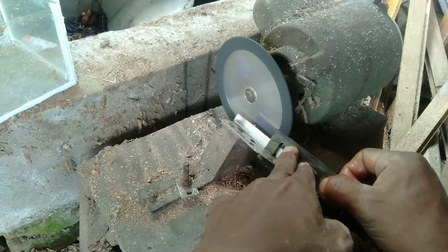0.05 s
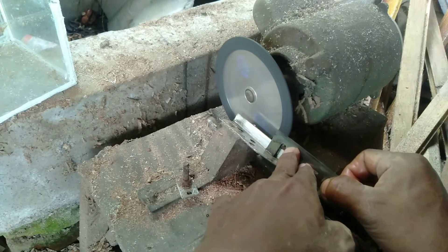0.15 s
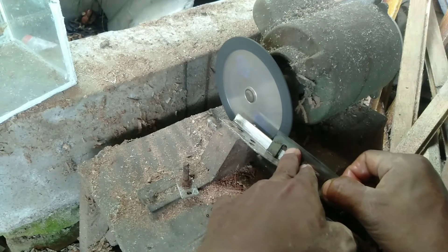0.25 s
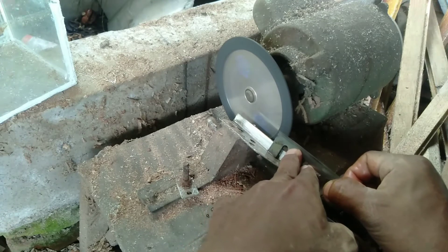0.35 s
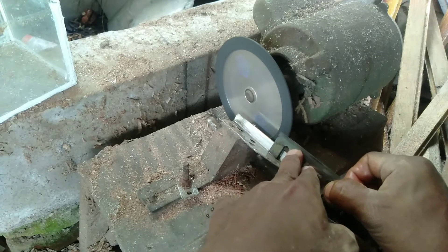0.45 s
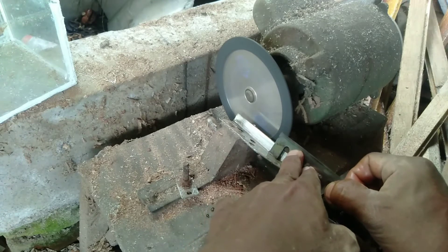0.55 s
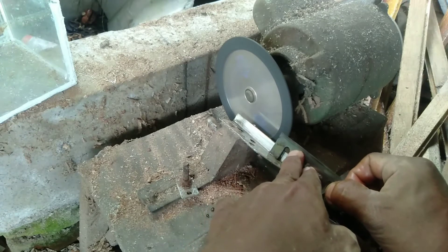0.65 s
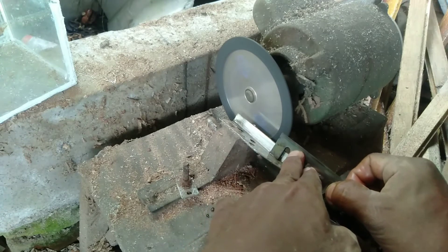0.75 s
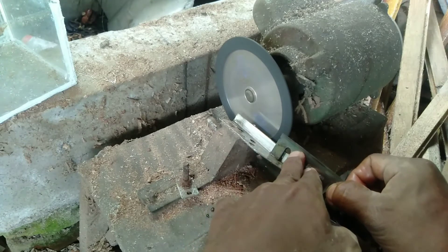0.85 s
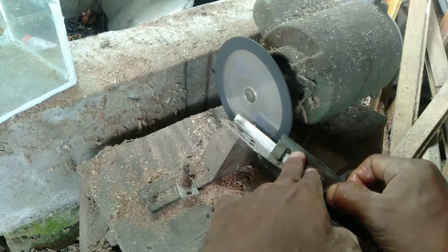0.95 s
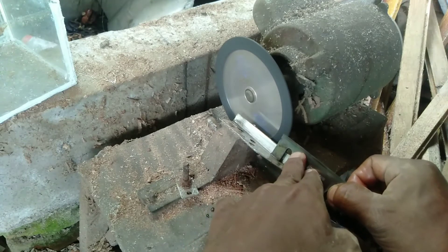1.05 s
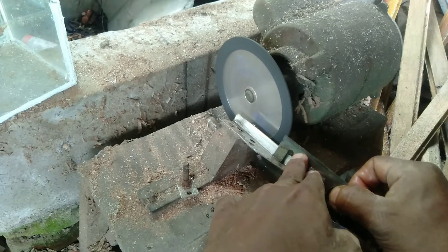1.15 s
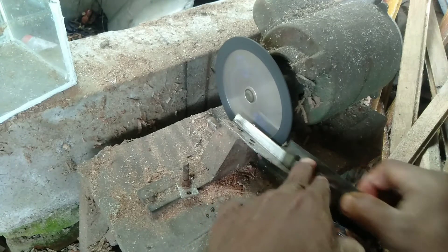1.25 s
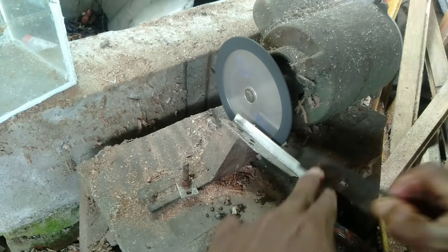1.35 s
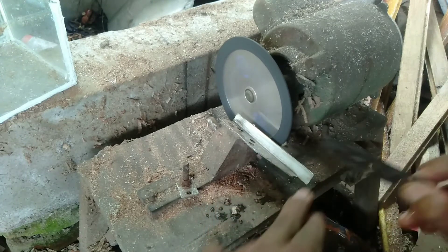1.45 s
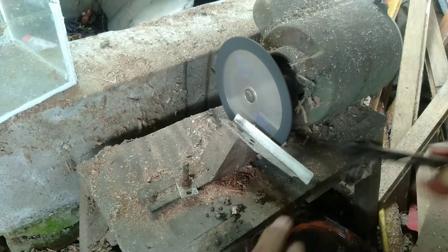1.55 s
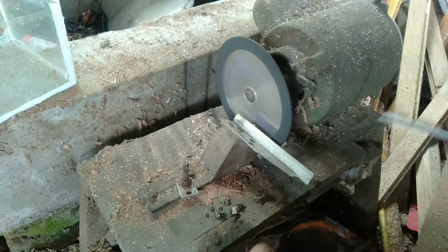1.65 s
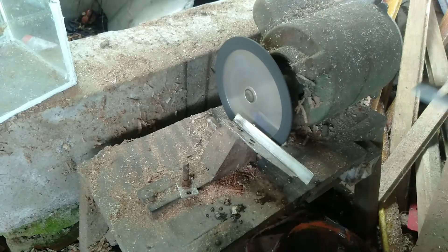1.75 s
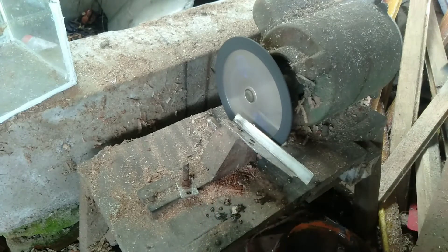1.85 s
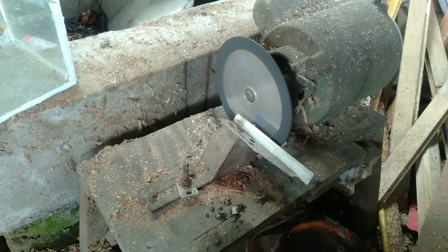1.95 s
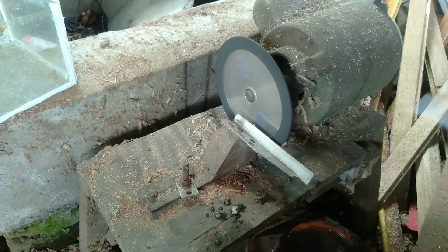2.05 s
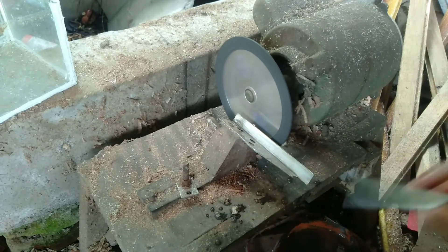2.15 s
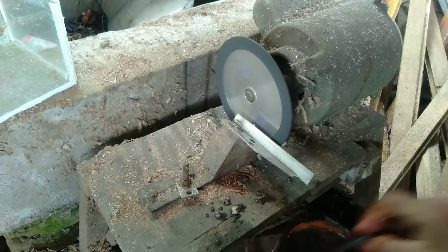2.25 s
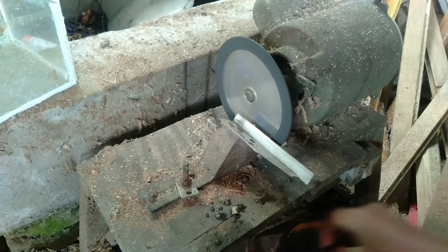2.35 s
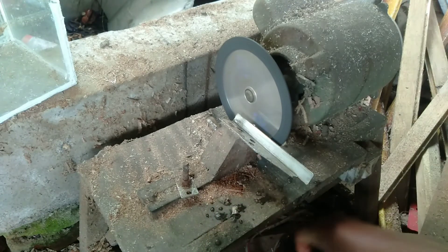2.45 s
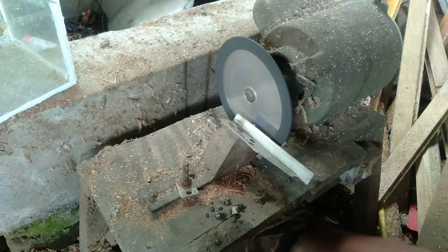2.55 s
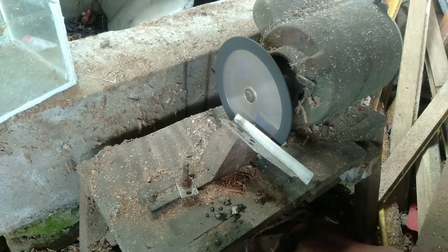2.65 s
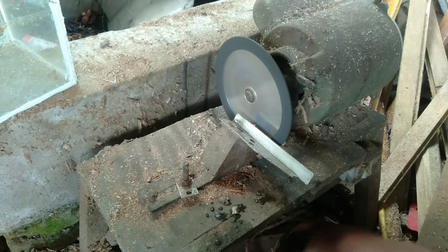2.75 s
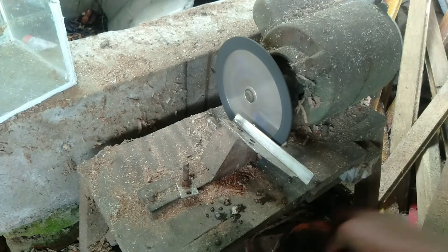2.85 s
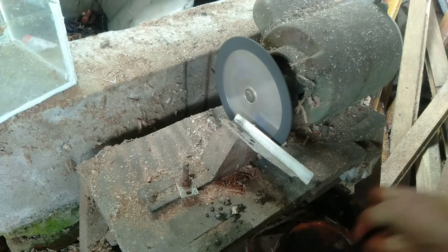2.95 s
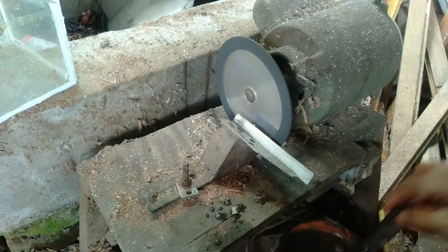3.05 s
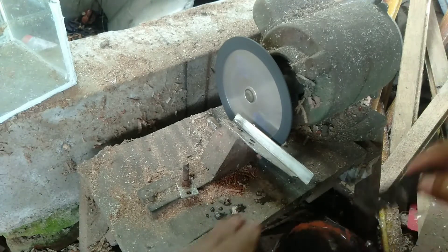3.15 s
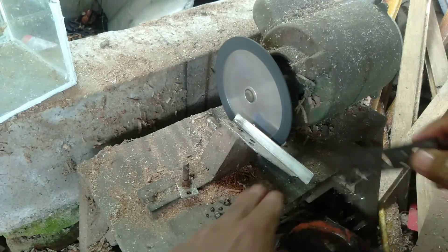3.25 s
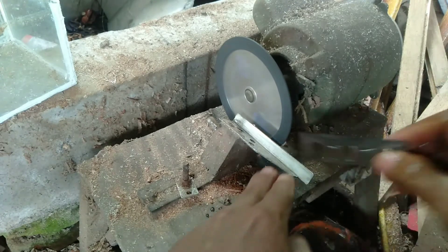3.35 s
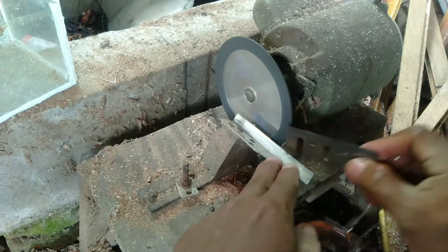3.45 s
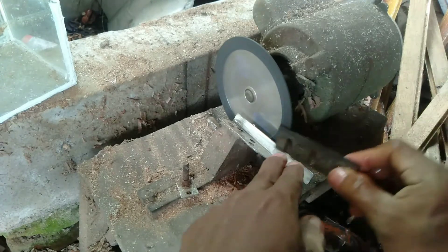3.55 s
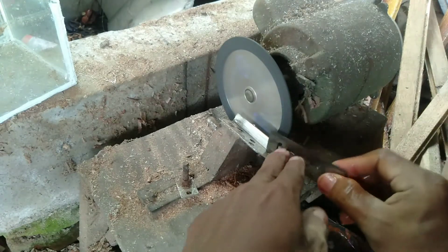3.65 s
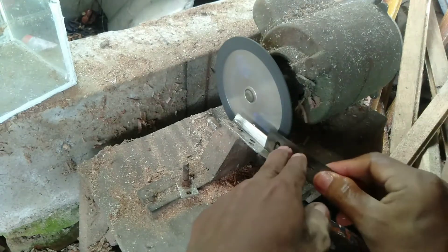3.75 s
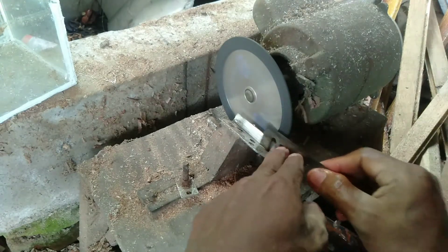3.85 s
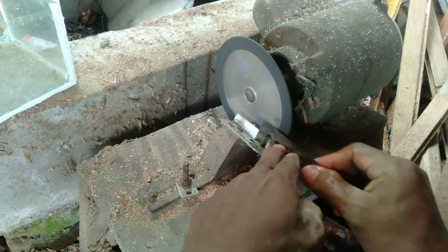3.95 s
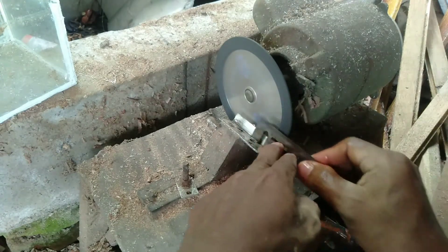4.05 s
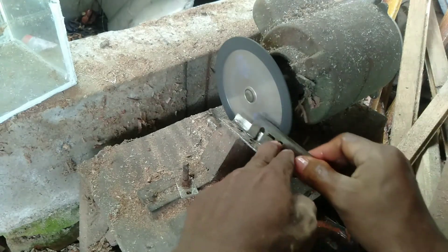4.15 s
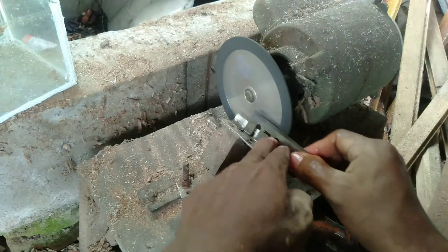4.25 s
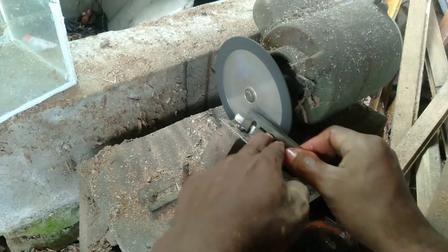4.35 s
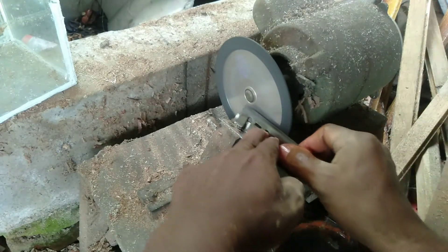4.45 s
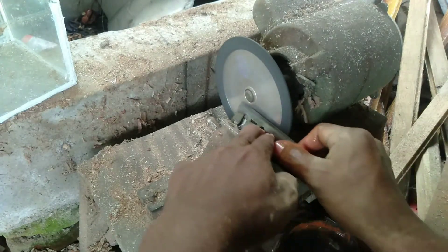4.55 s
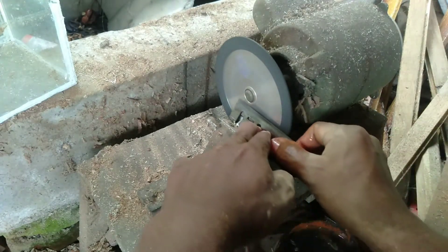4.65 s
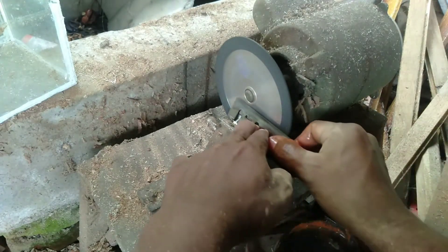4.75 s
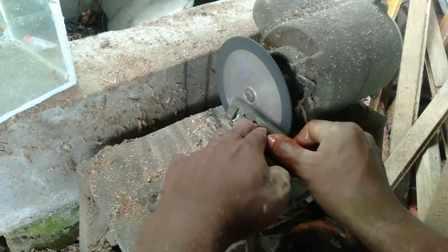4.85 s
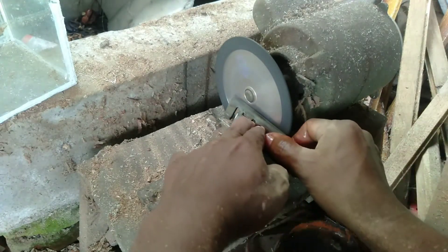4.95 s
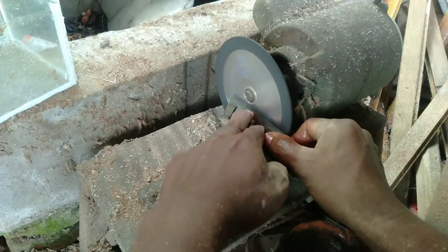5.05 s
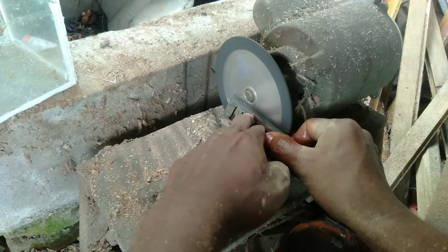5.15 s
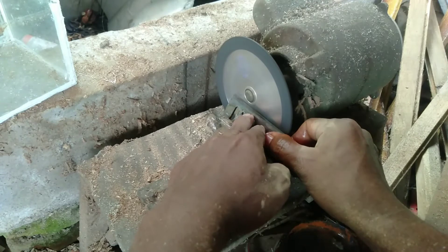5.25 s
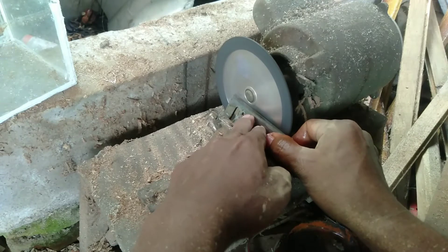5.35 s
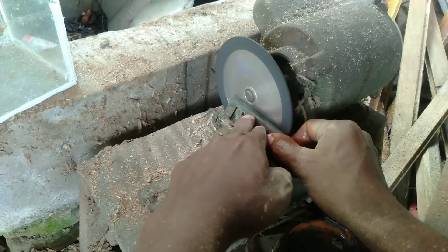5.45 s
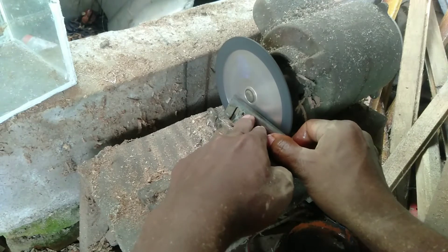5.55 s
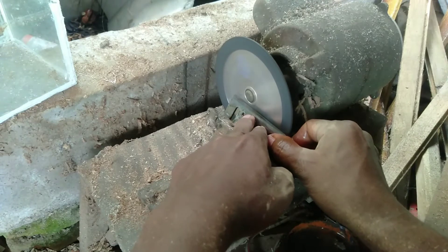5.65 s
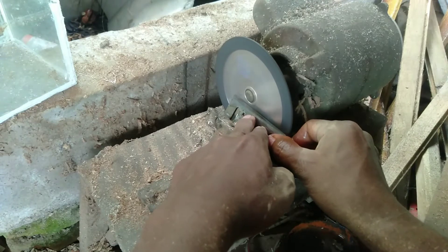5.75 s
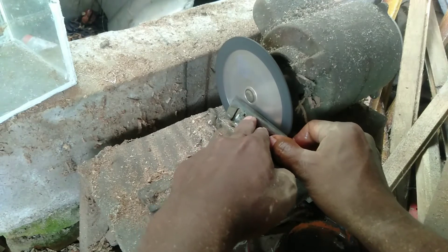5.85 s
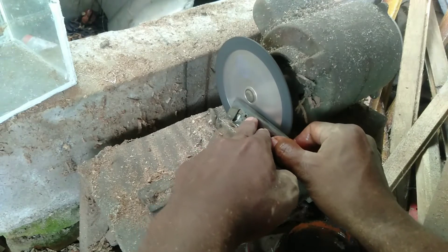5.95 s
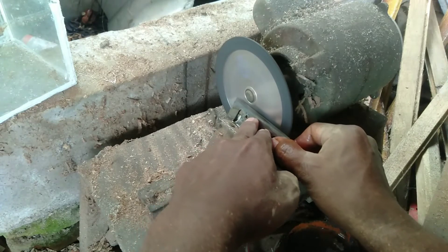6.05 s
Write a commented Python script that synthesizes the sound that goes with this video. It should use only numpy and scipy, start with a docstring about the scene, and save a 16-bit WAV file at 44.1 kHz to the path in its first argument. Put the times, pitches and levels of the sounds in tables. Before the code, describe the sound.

Close up at a workbench, a steel blade is pressed to a thin spinning grinding wheel, making a high, buzzing rasp. It lifts away after about a second, leaving the motor humming with rattling bearings and a thin whine. A quick cluster of metal clinks and knocks follows, then a dull slide and a brief squeal. The blade meets the wheel again in a much louder pass that grows to the end.

```python
"""At a workbench, close to the microphone, a steel blade is ground twice on a thin wheel spun by a motor.
Grit and a high spot replayed every turn excite the blade's resonances, so the steel buzzes at the shaft rate.
Light touches squeal, the blade rubs along the tool rest, and knocks on it add crack, ring and thump.
Behind lie a bearing's rattle bursts at the cage rate, shaft harmonics, filtered noise and a thin whine."""
import sys
import numpy as np
from scipy import signal
from scipy.fft import rfft, irfft
from scipy.io import wavfile
from scipy.ndimage import uniform_filter1d, map_coordinates

SR = 44100
rng = np.random.default_rng(int(sys.argv[2]) if len(sys.argv) > 2 else 0)


def store_wav(level_fs):
    """Save 16-bit WAV to argv[1]."""
    pcm = np.round(np.clip(np.atleast_2d(level_fs), -1, 1) * 32767)
    wavfile.write(sys.argv[1], SR, pcm.T.astype(np.int16))


N = 268128
TIME = np.arange(N) / SR

# Shaft speed, sagging under load: t/s, rate/(turns per second)
SHAFT_SPEED = [(0, 49.54), (.33, 49.52), (.65, 49.7), (1.1, 49.69), (1.25, 49.88), (5.25, 49.84),
               (5.45, 49.65), (5.65, 49.57), (5.9, 49.66)]


def amp(db):
    """Level to amplitude: 20 dB is a factor of ten."""
    return 10 ** (np.asarray(db) / 20)


def unit(x):
    """Power normalisation: scales to rms 1."""
    return x / np.sqrt(np.mean(x ** 2) + 1e-20)


def curves(rows):
    """Linear interpolation: each column of a timed table, at every sample."""
    t, *columns = np.transpose(rows)
    return [np.interp(TIME, t, column) for column in columns]


def wander(rate_hz):
    """Band-limited random drift: noise under a Gaussian spectrum, of rms 1."""
    hz = np.fft.rfftfreq(N, 1 / SR)
    spectrum = rfft(rng.standard_normal(N)) * np.exp(-(hz / rate_hz) ** 2)
    return unit(irfft(spectrum, N))


def high_pass(x, hz):
    """Second-order Butterworth filtering: passes what lies above the cutoff."""
    return signal.sosfilt(signal.butter(2, hz, "high", fs=SR, output="sos"), x)


def colour(x, slope, modes, size=8192):
    """Minimum-phase resonance: a broad slope with peaks and dips, causal, so modes ring after each grain."""
    hz = np.fft.rfftfreq(size, 1 / SR)
    f, slope_db = np.transpose(slope)
    db = np.interp(np.log(hz + 1), np.log(f), slope_db)
    for centre, width, height in modes:
        db = db + height / (1 + (2 * (hz - centre) / width) ** 2)
    # the phase of a causal response is the Hilbert transform of its log gain
    log_gain = np.log(amp(np.r_[db, db[-2:0:-1]]))
    response = np.exp(signal.hilbert(log_gain).conj())
    taps = np.fft.ifft(response).real[:size // 2]
    return signal.oaconvolve(x, taps)[:N]


def halves(x):
    """Complementary crossover: the parts below and above 3.2 kHz, each of rms 1."""
    below = 1 / (1 + (np.fft.rfftfreq(N, 1 / SR) / 3200) ** 8)
    low = irfft(rfft(x) * below, N)
    return np.array([unit(low), unit(x - low)])


def shaft_turns(since_s):
    """Phase as the integral of rate: turns made by the wheel since a given moment."""
    turns = np.cumsum(curves(SHAFT_SPEED)[0]) / SR
    return turns - np.interp(since_s, TIME, turns)


def lobe(turns, width):
    """Periodic modulation: a smooth bump once a turn, its width in turns."""
    return np.exp(-(np.sin(np.pi * turns) / (np.pi * width)) ** 2)


def grit(high_spot_s, bite, bite_width, second_bite, second_at, wear_hz, memory, lead_s, spread_s, bump,
         size=888):
    """Periodic excitation: grains round the rim replayed every turn, their fine detail wearing."""
    # How firmly the edge sits on the wheel: t/s, share of power that repeats each turn (0-1)
    grip_table = [(0, .98), (.95, 0.92), (1.2, 0.74), (4.35, 0.44), (5.15, 0.63), (5.33, 0.93)]
    judder_per_turn = 20  # the edge judders on the high spot at this multiple of the shaft rate

    turns = shaft_turns(high_spot_s) + .5
    turns -= np.floor(turns[0])
    angle = np.arange(size) / size - .5  # in turns, the high spot at zero
    pressure = 1 + bite * lobe(angle, bite_width) + second_bite * lobe(angle - second_at, bite_width)

    # the lasting pattern is equally strong at every multiple of the shaft rate
    judder = bump * lobe(angle, .08) * np.cos(2 * np.pi * judder_per_turn * angle)
    lasting = rng.standard_normal(size) + judder
    for _ in range(2):
        phase = np.angle(rfft(lasting * pressure))
        lasting = unit(irfft(np.exp(1j * phase)))

    # the wearing pattern is partly handed on from one turn to the next
    fresh = rng.standard_normal((int(turns[-1]) + 2, size))
    wearing = unit(signal.lfilter([1], [1, -memory], fresh, axis=0) * pressure)
    hz = np.arange(size // 2 + 1) * SHAFT_SPEED[0][1]
    kept = .98 / (1 + (hz / wear_hz) ** 2)  # lasting share of the power
    # the high spot shoves the blade a moment before its grains bite
    lead = np.exp(2j * np.pi * lead_s * 1800 * np.tanh(hz / 1800))
    lasting_part = np.sqrt(kept) * lead * rfft(lasting)
    wearing_part = np.sqrt(1 - kept) * rfft(wearing, axis=1)

    # bending waves of different pitch leave the steel at slightly different times
    delay_s = spread_s * unit(uniform_filter1d(rng.standard_normal(len(hz)), size=24))
    smear = np.exp(-2j * np.pi * np.cumsum(delay_s * np.tanh(hz / 3000)) * hz[1])
    rim = irfft(smear * (lasting_part + wearing_part), axis=1)
    replayed = unit(map_coordinates(rim.ravel(), [turns * size], order=5, mode="nearest"))

    # a lightly held edge skips over the grains at random
    skips = rng.standard_normal(N) * amp(1.5 * wander(120))
    skipping = unit(skips * (1 + 0.083 * lobe(turns - .5, 0.11)))
    grip = np.clip(curves(grip_table)[0], 0, 1)
    return np.sqrt(grip) * replayed + np.sqrt(1 - grip) * skipping


def contact():
    """Contact mechanics: how fully the edge meets the wheel, 0-1, at its lift and its later return."""
    lift_s, release_s = 1.244, 0.058  # moment contact ends, and the time its release takes
    touch_s, attack_s = 4.29, .12  # moment contact begins again, and the time its attack takes
    leaving = np.clip((lift_s - TIME) / release_s, 0, 1)
    returning = np.clip((TIME - touch_s) / attack_s, 0, 1)
    return leaving, returning


def grind(force, touching, levels, hold, next_hold, shift_s, shift_length_s, flutter_db):
    """Forced vibration: the grit rings the blade, whose resonances change as the hands shift their hold."""
    growl_power = 1.7  # the growl needs firm contact and follows this power of it; the hiss is in proportion
    shift = np.clip((TIME - shift_s) / shift_length_s + .5, 0, 1)
    before = halves(colour(force, *hold))
    after = halves(colour(force, *next_hold))
    steel = (1 - shift) * before + shift * after
    growl, hiss = steel * amp(curves(levels))
    ground = growl * touching ** growl_power + hiss * touching
    return ground * amp(flutter_db * wander(4.8))


def handling(slide_hz, slide_width_hz):
    """Friction-excited vibration: light touches make the edge squeal, sliding steel rubs dully on the rest."""
    # The edge brushing the wheel as it comes or goes: t/s at the middle, length/s, level/dB
    brushes = [(1.188, 0.12, -41), (3.548, 0.097, -49.5), (4.354, 0.091, -40.5)]
    # Resonances of the lightly touched edge: f/Hz, width/Hz, height/dB
    squeal_modes = [(2747, 170, 30), (5300, 250, 24), (7470, 120, 22.5), (8020, 200, 22)]
    # The blade sliding along the tool rest: t/s, level/dB
    slide_levels = [(3.6, -75), (3.8, -60), (4.25, -57), (4.42, -44), (4.6, -51), (5.3, -73)]

    touch = sum(amp(db) * np.exp(-(2 * (TIME - s) / length) ** 2) for s, length, db in brushes)
    squeal = unit(colour(rng.standard_normal(N), [(300, 6), (3000, -9), (15000, -5)], squeal_modes))
    rub = rng.standard_normal(N) * amp(2 * wander(60))
    rub_slope = [(100, -28), (400, -7.5), (1500, -8.0), (8000, -28)]
    rub = unit(colour(rub, rub_slope, [(slide_hz, slide_width_hz, 12)]))
    return touch * squeal + amp(curves(slide_levels)[0]) * rub


def knocks(crack_t60, thump_hz, thump_t60):
    """Impulse response: steel touching rest or wheel gives a crack, the blade's decaying modes and a bench thump."""
    # Impacts: t/s, crack level/dB, treble tilt/(dB per octave), ring level/dB, thump level/dB
    impacts = [(1.305, -36, -20, -66, -42), (3.5247, -32.5, 6.5, -57, -49), (3.5411, -32.5, -4, -52, -34.5),
               (3.561, -36, -13, -62, -52), (3.593, -39, -4.5, -58, -44), (3.615, -31.5, -11.5, -47.5, -40),
               (3.628, -36, -2, -50, -50), (3.6511, -24, -4.5, -31, -37), (3.783, -36.5, -7, -53, -47),
               (3.927, -41, -13.5, -51, -63)]
    # Modes of the loose blade: f/Hz, level/dB relative to the ring level, t60/s
    blade_modes = [(1860, -0.5, 0.058), (2650, -20, .07), (3206, -2.5, 0.069), (5200, -6, 0.13),
                   (6700, -11, .084), (6910, 7.5, 0.078), (8150, -2, 0.067), (10400, -22, .05),
                   (14700, -3, .04)]

    t = np.arange(SR // 4) / SR
    hz = np.fft.rfftfreq(len(t), 1 / SR)
    out = np.zeros(N + len(t))
    for s, crack_db, tilt_db, ring_db, thump_db in impacts:
        tilt = amp(tilt_db * np.log2((hz + 500) / 3000))
        shape = tilt * hz ** 2 / (hz ** 2 + 700 ** 2) / np.hypot(1, hz / 10000)
        crack = unit(irfft(rfft(rng.standard_normal(len(t))) * shape, len(t)))
        crack *= amp(-60 * t / crack_t60) + amp(-36 - 60 * t / 0.16)  # fast decay over a faint tail

        ring = 0
        for f, db, t60 in blade_modes:
            ring = ring + amp(db - 60 * t / t60) * np.sin(2 * np.pi * (f * t + rng.random()))

        thump = sum(np.sin(2 * np.pi * thump_hz * ratio * t) for ratio in (.82, 1, 1.15)) / 2
        thump = thump * amp(-60 * t / thump_t60) * (1 - np.exp(-t / 0.0018))
        knock = amp(crack_db) * crack + amp(ring_db) * ring + amp(thump_db) * thump
        out[round(s * SR):][:len(t)] += knock
    return out[:N]


def bearing(level_db, chatter_db, burst_width, grain_db):
    """Amplitude modulation: balls rattle once a turn of their cage, over a faint steady chatter."""
    # Rattle coming and going, before level_db and the beat: t/s, level/dB below 3.2 kHz, level/dB above
    rattle_levels = [(1.35, -38.5, -48), (1.6, -52, -52.5), (1.9, -44, -53), (2.05, -39, -44),
                     (2.46, -36.5, -46), (2.8, -39, -46.5), (3.17, -35, -52), (3.35, -43.5, -58.5),
                     (4.15, -53, -67), (4.29, -34.5, -47), (4.6, -56, -47)]
    # Broad slope of the housing: f/Hz, relative level/dB
    housing_slope = [(60, -5), (150, -8), (400, -6), (900, -19.5), (1500, -11), (3000, -33), (6000, -18),
                     (10000, -35.5), (15000, -35.5)]
    # Modes of the housing: f/Hz, width/Hz, height/dB
    housing_modes = [(398, 180, -11.5), (827, 82, 21.5), (1036, 116, 11), (1413, 110, -18.5),
                     (1630, 82, -15.5), (1845, 62, 4), (2160, 187, 16.5), (2167, 75, -21.5),
                     (2380, 50, 10.5), (3640, 560, 9), (5580, 84, 15), (5825, 460, -21.5), (8760, 1000, 3),
                     (12100, 570, -11)]
    cage_ratio, cage_burst_s = .363, 2.678  # cage turns per shaft turn; time of one burst
    beat_db = 2  # bursts swell and sink as the cage drifts in and out of step with the shaft

    turns = shaft_turns(cage_burst_s)
    cage = cage_ratio * turns
    in_step = np.cos(2 * np.pi * (3 * cage - turns))
    strength_db = level_db + np.array(curves(rattle_levels)) + beat_db * in_step
    bursts = amp(chatter_db) + lobe(cage, burst_width) * amp(strength_db)
    balls = unit(rng.standard_normal(N) * amp(grain_db * wander(470)))
    out = 0
    for side, burst in enumerate(bursts):
        housing = high_pass(colour(balls * burst, housing_slope, housing_modes), 640)
        out = out + halves(housing)[side] * np.sqrt(np.mean(burst ** 2))
    return out


def motor(whirr_db, waver_db, throb_db):
    """Harmonic synthesis: wavering shaft tones, with a noise whirr of air and bearings and a low bench throb."""
    # Tones: multiple of the shaft rate, level/dB with the rest free, level/dB with a hand on it
    tones = [(1, -62.5, -69), (2, -67, -70), (3, -92, -68.5), (4, -67, -64.5), (5, -55.5, -65),
             (10, -65.5, -64), (14, -65, -61), (15, -88, -99), (16, -55, -77), (17, -50, -57),
             (21, -51.5, -51.5), (23, -58, -55.5)]
    # Broad slope of the whirr: f/Hz, relative level/dB
    whirr_slope = [(60, -11.5), (150, -11.5), (400, -12.5), (900, -7), (1500, -21), (3000, -21),
                   (6000, -22.5), (10000, -30.5), (15000, -29)]
    # Modes of the whirr: f/Hz, width/Hz, height/dB
    whirr_modes = [(837, 37, 5), (1107, 150, 3), (1840, 340, 7.5), (5420, 300, 17.5), (5720, 1300, -15.5),
                   (7040, 1200, 13.5), (12431, 480, -4.4), (15067, 900, 10)]

    turns = shaft_turns(0) + 0.0013 * wander(3.1)
    # a hand on the rest damps the bench
    held = np.interp(TIME, [3.5, 3.7, 4.3, 4.6], [0.15, 0.92, 1, 0.33])
    hum = 0
    for multiple, free_db, held_db in tones:
        db = free_db + held * (held_db - free_db) + waver_db * wander(7.0)
        hum = hum + np.sqrt(2) * amp(db) * np.sin(2 * np.pi * (multiple * turns + rng.random()))

    air = rng.standard_normal(N) * (1 + .5 * lobe(turns, 0.1))  # swells once a turn
    whirr = unit(high_pass(colour(air, whirr_slope, whirr_modes), 36))
    throb = np.sin(2 * np.pi * 58 * TIME + 1.4 * wander(8.2))
    return hum + amp(whirr_db) * whirr + amp(throb_db) * throb


def whine(hz, waver_hz, flicker_db):
    """Frequency modulation: a thin, unsteady tone of the free-running machine, stopped by the grinding load."""
    # Level while the wheel runs free, before flicker: t/s, level/dB
    whine_levels = [(1.38, -53), (1.8, -60), (2.8, -68), (3.5, -52.5), (3.7, -56.5)]
    turns = np.cumsum(hz + waver_hz * (wander(4.2) + wander(88))) / SR
    free = 1 - sum(contact())
    level = amp(curves(whine_levels)[0] + flicker_db * wander(46))
    return np.sqrt(2) * free * level * np.sin(2 * np.pi * turns)


def scene():
    """Superposition: two grinding passes, touches and knocks over the running motor."""
    # Pass levels before trim, contact and flutter: t/s, growl level/dB below 3.2 kHz, hiss level/dB above
    first_levels = [(0.02, -29.5, -29), (0.164, -31.5, -27), (0.24, -32.5, -28), (0.746, -36.5, -28.5),
                    (0.912, -35.5, -28), (0.932, -39, -30), (1.112, -36.5, -29), (1.17, -39, -31)]
    second_levels = [(4.42, -34.5, -37), (4.712, -36, -31.5), (5.026, -37.5, -32), (5.082, -39, -35),
                     (5.146, -34, -30), (5.324, -33, -27.5), (5.844, -31, -27), (6.06, -33.5, -28)]
    # The blade in four holds, each a broad slope: f/Hz, relative level/dB
    # and its resonances and dips: f/Hz, width/Hz, height/dB
    pressed = [(60, -48), (150, -50), (400, -53), (900, -30), (1500, -28), (3000, -16), (6000, -25.5),
               (10000, -30.4), (15000, -27.5)], [(322, 480, 27), (816, 36, 6), (976, 95, 23), (1093, 128, -20),
                                (1163, 400, 13.5), (1920, 37, 10), (2055, 360, 17), (2310, 290, -7.5),
                                (2662, 81, 22), (2791, 48, 19), (2900, 40, 10.5), (3000, 140, -19),
                                (4460, 450, -7), (5414, 100, 17.5), (5670, 260, 21), (6530, 520, 15.5),
                                (7334, 480, 7), (7930, 250, 12), (8320, 93, 20), (8440, 97, 16),
                                (10645, 88, 3), (11157, 260, 15), (12525, 86, -10.8), (13350, 131, 15.6),
                                (13854, 350, 15), (14600, 550, 13.5)]
    eased = [(60, -29), (150, -36), (400, -18.5), (900, -32), (1500, -28), (3000, -17), (6000, -17),
             (10000, -26.5), (15000, -23.5)], [(742, 61, -21), (824, 100, 15.5), (969, 145, 25), (1280, 70, 11), (1990, 17, 8),
                            (1946, 740, 19.5), (2670, 130, 18.5), (2804, 110, 13.5), (2935, 390, -14.5),
                            (4423, 190, -20.5), (4970, 62, 8.5), (5310, 120, 14.5), (5596, 160, 17),
                            (5820, 180, 10.5), (6390, 1030, -12), (6640, 540, 16), (8008, 127, 25.5),
                            (8420, 140, 11), (9100, 267, 9.5), (10400, 130, -13), (10770, 77, 13),
                            (11130, 430, 13.5), (12870, 158, -26), (13150, 131, 17), (13900, 270, 12),
                            (14500, 490, 14)]
    skimming = [(60, -16), (150, -40), (400, -10), (900, -5.5), (1500, -24.5), (3000, -21.5), (6000, -12.5),
                (10000, -25), (15000, -13.5)], [(750, 51, -20), (1001, 30, 12), (1784, 61, 16), (1930, 36, 14.5),
                                  (2077, 460, 18.5), (2360, 150, 9), (2900, 560, 14), (3110, 150, -20.5),
                                  (3225, 110, 14), (4580, 740, -15), (5470, 63, 12), (5570, 960, 13),
                                  (6050, 350, -13.6), (6700, 650, 5.5), (7970, 140, 14), (8380, 230, 21),
                                  (9353, 190, -14), (10630, 350, 12.5), (11960, 680, -15), (12400, 91, 11),
                                  (13560, 250, 13), (13700, 170, 2)]
    seated = [(60, -27), (150, -57), (400, -20.5), (900, -31.5), (1500, -13), (3000, -22.5), (6000, -8),
              (10000, -25.5), (15000, -17)], [(762, 70, -20), (856, 260, 20.5), (987, 186, 20), (1110, 78, -8.5),
                              (1257, 76, 16.5), (1530, 310, -19), (1956, 123, 11.5), (3200, 140, -13.5),
                              (3300, 98, 17), (3650, 170, 12), (4030, 1040, -11), (4690, 190, -19),
                              (5290, 71, 12), (5700, 430, 5), (6200, 200, -3.5), (7050, 140, 7),
                              (7740, 120, 7), (7990, 92, 10), (8430, 190, 17.5), (10800, 120, 12),
                              (11320, 240, 16), (11900, 311, -11.5), (13000, 470, -19), (13240, 310, 25),
                              (13700, 120, 15), (14940, 260, 11.5)]

    leaving, returning = contact()
    force = grit(high_spot_s=.1025, bite=1.1, bite_width=0.12, second_bite=0.33, second_at=0.37,
                 wear_hz=5200, memory=0.76, lead_s=0.00299, spread_s=0.00181, bump=0.33)
    first = grind(force, leaving, first_levels, pressed, eased,
                  shift_s=0.47, shift_length_s=0.74, flutter_db=0.32)
    force = grit(high_spot_s=5.5235, bite=1.6, bite_width=0.17, second_bite=0.76, second_at=0.4,
                 wear_hz=5860, memory=0.88, lead_s=0.002987, spread_s=0.00124, bump=1.14)
    second = grind(force, returning, second_levels, skimming, seated,
                   shift_s=5.21, shift_length_s=0.54, flutter_db=0.5)
    grinding = amp(0.04) * first + amp(0.25) * second

    touches = handling(slide_hz=458, slide_width_hz=250)
    clinks = knocks(crack_t60=0.034, thump_hz=311, thump_t60=0.11)
    rattle = bearing(level_db=-2.5, chatter_db=-58.5, burst_width=0.18, grain_db=4.0)
    running = motor(whirr_db=-51.5, waver_db=0.94, throb_db=-60.5)
    running = running + whine(hz=1837, waver_hz=28.38, flicker_db=3.5)
    return (grinding + touches + clinks + rattle + running)[None]


def record(dry):
    """Linear-phase low-pass filtering: the recorder's band limit."""
    edge_hz = 15650
    taps = signal.firwin(511, edge_hz, window=("kaiser", 9), fs=SR)
    return signal.oaconvolve(dry, taps[None], "same")


dry = scene()
out = record(dry)
store_wav(out)
```